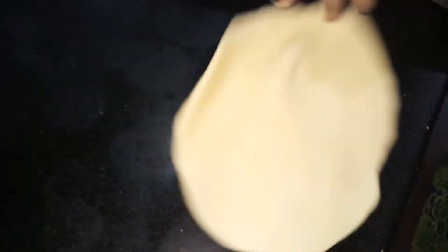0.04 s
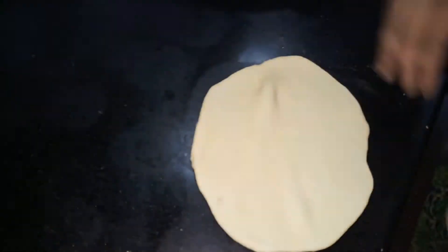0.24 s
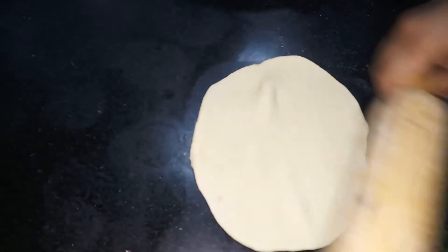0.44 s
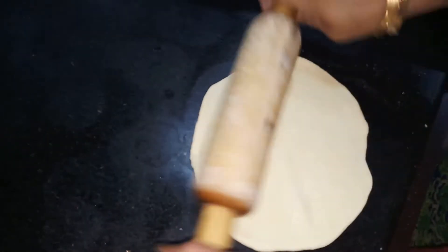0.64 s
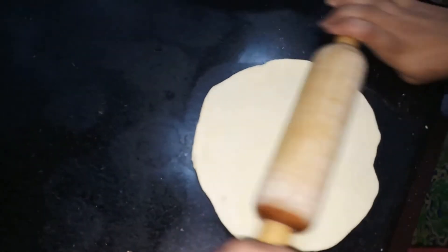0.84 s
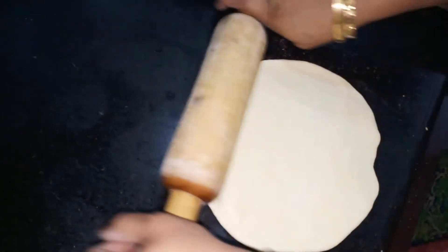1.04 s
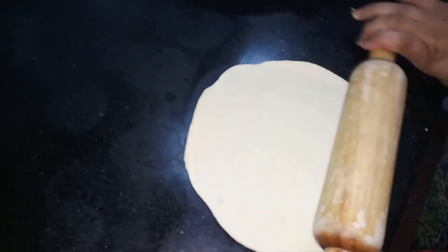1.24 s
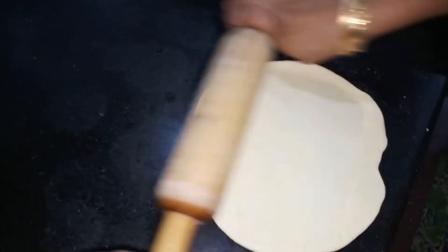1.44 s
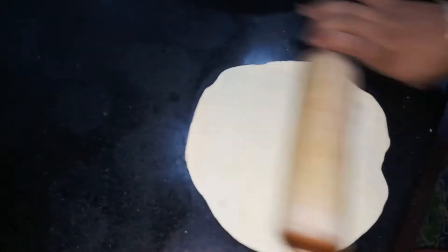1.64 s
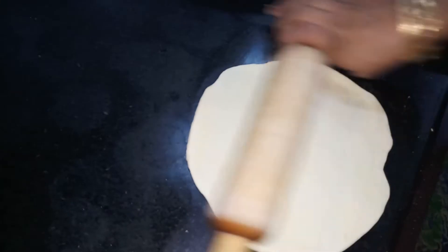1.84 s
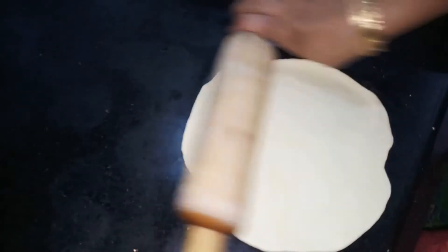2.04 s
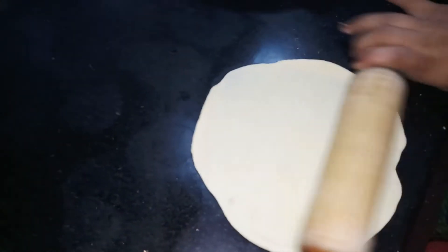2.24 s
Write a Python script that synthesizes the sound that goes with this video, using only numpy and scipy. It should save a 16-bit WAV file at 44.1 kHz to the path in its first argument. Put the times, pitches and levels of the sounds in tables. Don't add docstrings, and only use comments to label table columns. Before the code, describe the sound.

Dough slaps loudly onto a counter, a wooden pin lands with a resonant knock, then rhythmic hissing strokes roll back and forth with thin metal bangle clinks and faint creaks; hard reverberant room, phone pickup.

```python
import sys
import numpy as np
from scipy import signal
from scipy.fft import rfft, irfft, next_fast_len
from scipy.io import wavfile
from scipy.ndimage import map_coordinates

SR = 44100
rng = np.random.default_rng(int(sys.argv[2]) if len(sys.argv) > 2 else 0)


def pcm_store(signal):
    levels = np.round(np.clip(np.atleast_2d(signal), -1, 1) * 32767)
    wavfile.write(sys.argv[1], SR, levels.astype(np.int16).T)


def makeup_ratio(level_db):
    decades = np.asarray(level_db, float) / 20
    return 10 ** decades


N = 101429


def unit(x):
    return x / np.sqrt(np.mean(x ** 2) + 1e-20)


def along(points, hz):
    point_hz, value = np.transpose(points)
    return np.interp(np.log(hz + 1), np.log(point_hz + 1), value)


def wobble(rate_hz):
    knots = rng.standard_normal(int(N * rate_hz / SR) + 4)
    return map_coordinates(knots, [np.arange(N) * rate_hz / SR])


def filtered(x, response):
    size = next_fast_len(N + SR)
    spectrum = rfft(x, size) * response(np.fft.rfftfreq(size, 1 / SR))
    return irfft(spectrum, size)[..., :N]


def resonant(x, peaks):
    def response(f):
        total = 0
        for k, (hz, width, db) in enumerate(peaks):
            total = total + (-1) ** k * makeup_ratio(db) * 1j * f * width / (hz * hz - f * f + 1j * f * width)
        return total
    return filtered(x, response)


def bursts(rows):
    t = np.arange(N) / SR
    total = np.zeros(N)
    for start, db, t60 in rows:
        total += (t >= start) * makeup_ratio(db - 60 * abs(t - start) / t60) * rng.standard_normal(N)
    return total


def rings(modes):
    t = np.arange(SR) / SR
    return sum(makeup_ratio(db - 60 * t / t60) * np.sin(2 * np.pi * hz * t) for hz, db, t60 in modes)


# middle_s, half_length_s, rub_db, push_db (into the counter),
# weight_db (on the handles)
ROLLING_STROKES = [(0.062, 0.034, -76.5, -61, -76), (0.129, 0.017, -58, -55.5, -69),
                   (0.461, 0.026, -50, -60, -56.5), (0.555, 0.034, -52, -68.5, -56),
                   (0.676, 0.076, -55.5, -65, -64.5), (0.862, 0.037, -53, -64, -57.5),
                   (0.985, 0.038, -57.5, -76, -64), (1.08, 0.034, -50.5, -50, -59),
                   (1.302, 0.053, -49, -54, -56), (1.532, 0.051, -44.5, -59, -52),
                   (1.678, 0.14, -61, -66, -60), (1.767, 0.047, -48, -57.5, -53.5),
                   (1.887, 0.02, -57, -60.5, -61), (1.991, 0.051, -44, -62, -49.5),
                   (2.088, 0.062, -62.5, -81, -66.5), (2.257, 0.064, -45.5, -53, -52)]


def strokes():
    middle, half_length, *levels_db = np.transpose(ROLLING_STROKES)[:, :, None]
    bell = np.exp(-((np.arange(N) / SR - middle) / half_length) ** 2)
    return [np.sqrt((bell * makeup_ratio(2 * db)).sum(0)) for db in levels_db]


# pitch_hz, level_db (per Hz)
FLOUR_COLOUR = [(1650, -65.5), (2800, -43), (4210, -13), (4630, 5.5), (5640, 2.5), (8730, 8), (9820, 0),
                (15100, 2), (16000, -34)]
# pitch_hz, width_hz, level_db
PIN_BODY = [(1657, 170, -7.5), (2396, 115, 1.5), (3030, 870, -8), (4560, 400, 0.5)]


def rolling():
    def grit():
        return rng.standard_normal(N) * makeup_ratio(1.0 * wobble(470))

    rub, _, weight = strokes()
    hiss = unit(filtered(grit(), lambda hz: makeup_ratio(along(FLOUR_COLOUR, hz))))
    uneven_grit = grit() * makeup_ratio(1.7 * wobble(60))
    return rub * hiss + weight * unit(resonant(uneven_grit, PIN_BODY))


# start_s, level_db, t60_s
DOUGH_FLAPS = [
    (.1983, -21.5, 0.12),
    (.207, -17, 0.03),
    (.2112, -7.5, .012),
    (.2155, -14.5, 0.022),
    (.231, -24, 0.03),
]
# pitch_hz, width_hz, level_db
DOUGH_BODY = [(277, 200, -13), (610, 260, -10.5), (803, 99, 2.5), (987, 280, 2), (1560, 210, -13.5),
              (1967, 170, 6), (2140, 920, 0), (2820, 73, -16.5), (4780, 2900, -11), (8430, 1500, -15.5),
              (13520, 5300, -32.5)]
# start_s, pitch_hz, level_db, t60_s, rise_ms
AIR_POCKETS = [(.1983, 1260, -20.5, 0.012, 0.22), (.2093, 1126, -4.5, 0.015, 0.43),
               (0.2096, 2160, 0, 0.0057, 0.095), (.2105, 277, -21.5, 0.053, 3),
               (.2112, 4780, -13.5, 0.0072, 0.033), (.2112, 950, -8.5, 0.014, 0.076),
               (.2128, 842, -8, 0.037, .6), (0.2148, 2013, -5.5, 0.02, 0.43),
               (.2305, 846, -11.5, 0.019, .8), (.2345, 2155, -22, 0.035, 0.62),
               (.2425, 830, -28.5, .04, 1.5)]


def slap():
    start, hz, db, t60, rise_ms = np.transpose(AIR_POCKETS)[:, :, None]
    t = np.clip(np.arange(N) / SR - start, 0, None)
    rise = 1 - np.exp(-t * 1e3 / rise_ms)
    pockets = makeup_ratio(db - 60 * t / t60) * rise * np.sin(2 * np.pi * hz * t)
    return makeup_ratio(8.5) * resonant(bursts(DOUGH_FLAPS), DOUGH_BODY) - pockets.sum(0)


# start_s, level_db, t60_s
PIN_KNOCKS = [
    (.772, -32.5, 0.0237),
    (.7765, -18.5, 0.031),
]
# pitch_hz, width_hz, level_db
WOOD_BODY = [(676, 450, -8.5), (1140, 164, 5), (2200, 376, -9.5), (2920, 670, -10), (4700, 860, -6.5),
             (8500, 9700, -18)]


def pin_landing():
    return makeup_ratio(9.0) * resonant(bursts(PIN_KNOCKS), WOOD_BODY)


# start_s, level_db, softness_ms, deep_share_db (into the lowest pair)
COUNTER_BLOWS = [(0.214, -33, 0.9, -3), (0.233, -28, 5.7, 11), (0.771, -67, 0.27, -21),
                 (.779, -17, 0.44, -11.5), (0.79, -21.5, 2.1, -3), (0.799, -25.5, 1.04, 3),
                 (1.076, -48, 4.7, 6), (1.24, -51, 4, 11), (1.315, -49, 3.45, 9), (1.541, -49.5, 3.7, 7.5),
                 (1.743, -47, 3.9, 8.5), (1.799, -48.5, 4.1, 9.5), (2.21, -45.5, 4, 10),
                 (2.255, -45, 3.7, 10)]
# pitch_hz, level_db, t60_s
COUNTER_MODES = [(136.7, -19, .2), (154.1, -11.5, 0.38), (160, -8, 0.077), (190.5, -4.5, 0.08),
                 (219, -5.5, 0.065), (270, -10, 0.071), (288.4, -7, 0.12), (316, -9, 0.1),
                 (347, -12, 0.041), (384, -16, .08), (409.6, -13.5, 0.17), (480, -13.5, 0.06),
                 (510, -12.5, 0.17), (563, -21, .12)]


def counter():
    slab_hz = 84.2
    time = np.arange(N) / SR
    upper = rings(COUNTER_MODES)
    pair = rings([(92, -7.5, 0.49), (98, -4.5, 0.49)])

    def slab(hz):
        s = 1j * hz / slab_hz
        return (s ** 2 / (s ** 2 + 0.9 * s + 1)) ** 2

    start, db, soft_ms, deep_db = np.transpose(COUNTER_BLOWS)[:, :, None]
    blows = makeup_ratio(db) * np.exp(-((time - start) * 1e3 / soft_ms) ** 2) / (soft_ms * 78)
    deep_blows = (makeup_ratio(deep_db) * blows).sum(0)
    soft_noise = filtered(rng.standard_normal(N), lambda hz: 1 / (1 + (hz / 400) ** 2))
    damped_modes = (upper + makeup_ratio(-2.5) * pair) * makeup_ratio(-60 * time[:SR] / 0.5)
    hum = unit(signal.fftconvolve(soft_noise, damped_modes)[:N])
    low = signal.fftconvolve(blows.sum(0), upper)[:N]
    deep = signal.fftconvolve(deep_blows, pair)[:N] + strokes()[1] * hum
    return filtered(low, slab), filtered(deep, slab)


# start_s, level_db, t60_s
SHUDDER_BURSTS = [
    (.7795, -6, 0.062),
    (.785, -15.5, 0.4),
]
# pitch_hz, width_hz, level_db
SHUDDER_BODY = [(140, 40, -3), (185, 48, -0.5), (314, 104, 1.5), (486, 135, -4.5)]


def counter_shudder():
    low_rumble = resonant(bursts(SHUDDER_BURSTS), SHUDDER_BODY)
    return makeup_ratio(5.5) * resonant(low_rumble, [(296, 900, 0)])


# start_s, level_db, favoured_hz, brightness_db (per octave), ring_length (factor)
BANGLE_CONTACTS = [(.4203, -29.5, 4590, -6, .9), (0.4227, -29, 7620, -2.5, 0.806),
                   (0.43, -36, 6130, 1.5, 0.96), (.455, -37.5, 4590, 3, 0.88), (0.503, -32, 4780, -1, .6),
                   (.805, -27.5, 4590, -6.5, 0.6), (1.0597, -26.5, 6130, -2.5, 1),
                   (1.0625, -26, 6890, 7.5, .8), (1.067, -30.5, 4590, 0.5, 0.67),
                   (1.0715, -26.5, 4590, 4, .8), (1.0775, -32, 11530, 9, 0.92),
                   (1.0817, -15.5, 15400, 6.5, 0.52), (1.0814, -17, 8290, 3, 0.9),
                   (1.0845, -19.5, 8290, 2.5, .7), (1.0878, -20.5, 7920, 7.5, 0.62),
                   (1.0925, -21, 7920, 5.5, .6), (1.0955, -22.5, 7920, 5, 1.2),
                   (1.1055, -26.5, 8290, 2, .8), (1.109, -31.5, 8290, 1.5, 0.74),
                   (1.491, -24.5, 6130, -1, 0.63), (1.4955, -36.5, 11530, 3.5, 0.38),
                   (1.5148, -35.5, 6130, 0.5, 1.2), (1.5207, -22.5, 6890, 3.5, 0.71),
                   (1.528, -24, 4590, 2.5, 0.78), (1.5335, -23.5, 4780, 7, 0.65),
                   (1.541, -23, 5400, 6, 0.95), (1.5476, -23, 8290, -1, 0.62),
                   (1.5545, -30.5, 11530, 0, .7), (1.83, -39, 6130, 5.5, 0.65),
                   (1.931, -25, 6130, -6.5, 0.91), (1.959, -34.5, 4780, 11, .8),
                   (1.976, -56, 6130, -5, 0.68), (1.9868, -24.5, 6130, -6.5, 0.83),
                   (1.9961, -21, 8290, 2.5, 0.49), (2.0005, -27.5, 9200, 10, 0.69),
                   (2.0791, -35.5, 8290, -2, 0.78)]
# pitch_hz, level_db, t60_s
BANGLE_MODES = [(4590, -4, 0.11), (4780, -5, 0.043), (5400, -1, 0.018), (6130, 2, 0.044),
                (6890, -1.5, 0.049), (7620, -6.5, 0.097), (7920, 5.5, 0.017), (8290, -0.5, 0.049),
                (9200, -7.5, 0.069), (10740, -6, 0.039), (11530, -5, 0.047), (12340, -8.5, 0.032),
                (14450, -14, 0.041), (15400, -15.5, .03)]


def bangles():
    favour_db, favour_octaves, spread_db = 9, 0.04, -4
    detune, chatter_depth, chatter_hz, free_s = 0.006, 0.7, 280, 0.0026
    tick_db, tick_s, clink_db, floor_hz = -3, 0.045, -13.5, 3850
    out, t = np.zeros(N + SR), np.arange(SR // 4) / SR
    hz, mode_db, t60 = np.transpose(BANGLE_MODES)[:, :, None]
    for start, db, favoured_hz, bright_db, length in BANGLE_CONTACTS:
        luck = rng.standard_normal((2, len(hz), 1))
        octaves_off = np.log2(hz / favoured_hz)
        gain_db = mode_db + favour_db * np.exp(-(octaves_off / favour_octaves) ** 2)
        gain_db = gain_db + bright_db * np.log2(hz / 6000) + spread_db * np.tanh(luck[0])
        knots = rng.standard_normal((len(hz), chatter_hz // 4 + 2))
        jitter = np.array([np.interp(t * chatter_hz, np.arange(len(k)), k) for k in knots])
        chatter = 1 + chatter_depth * (1 - np.exp(-t / free_s)) * jitter
        ring_hz = hz * (1 + detune * luck[1] * (hz / 7000) ** 2)
        ring = makeup_ratio(gain_db - 60 * t / (t60 * length)) * chatter * np.sin(2 * np.pi * ring_hz * t)
        sharp_noise = np.diff(rng.standard_normal(len(t) + 2), 2) / 2
        tick = makeup_ratio(tick_db + bright_db - 60 * t / tick_s) * sharp_noise
        clink = (ring.sum(0) + tick) * (1 - np.exp(-t / 0.0001))
        out[round(start * SR):][:len(t)] += makeup_ratio(db + clink_db) * clink
    return filtered(out[:N], lambda f: 1 / (1 + floor_hz / (1j * f + 1)) ** 2)


# start_s, pitch_hz, level_db, rise_s, t60_s
HANDLE_CREAKS = [
    (1.082, 1582, -39.5, 0.012, 0.078),
    (1.085, 2930, -44.5, 0.0067, 0.13),
    (1.765, 1600, -42.5, 0.005, 0.05),
    (2.095, 1746, -55.5, 0.0098, 0.37),
    (2.206, 1580, -40, 0.0014, 0.034),
    (2.215, 1604, -51, 0.005, 0.38),
]


def creaks():
    t = np.arange(N) / SR
    total = np.zeros(N)
    for start, hz, db, rise_s, t60 in HANDLE_CREAKS:
        level = makeup_ratio(db - 60 * abs(t - start) / t60 + 3.8 * wobble(90))
        rise = 1 - np.exp(-np.clip(t - start, 0, None) / rise_s)
        phase = 2 * np.pi * np.cumsum(hz + 45 * wobble(130)) / SR
        total += level * rise * np.sin(phase)
    return total


# pitch_hz, t60_s
ROOM_DECAY = [(100, 0.55), (800, 0.48), (2200, 0.44), (5000, 0.38), (12000, 0.31)]


def kitchen(x):
    hz, t, noise = signal.stft(rng.standard_normal(SR), SR, nperseg=256)
    decay = makeup_ratio(-60 * t / along(ROOM_DECAY, hz)[:, None])
    tail = signal.istft(noise * decay, SR, nperseg=256)[1]
    late = np.pad(x, (200, 0))
    return signal.fftconvolve(late, tail / np.linalg.norm(tail))[:N]


# pitch_hz, level_db (per Hz)
AIR_COLOUR = [(30, -6.5), (480, 1.5), (850, -17), (1290, -13), (1700, -18.5), (3800, -24), (8600, -13.5),
              (9500, -37.5)]
# time_s, level_db
AIR_SWELL = [(0, -2), (0.699, -5.5), (1.22, -4.5), (1.499, -1), (2.001, 2), (2.3, 2)]


def hush():
    swell_db = np.interp(np.arange(N) / SR, *np.transpose(AIR_SWELL))
    air = unit(filtered(rng.standard_normal(N), lambda hz: makeup_ratio(along(AIR_COLOUR, hz))))
    return makeup_ratio(-55 + swell_db) * air


def scene():
    dough, wood = slap(), pin_landing()
    low, deep = counter()
    metal = bangles() + creaks()
    wet = makeup_ratio(-9.5) * kitchen(dough) + makeup_ratio(-7) * kitchen(wood)
    wet = wet + makeup_ratio(-7.5) * kitchen(low) + makeup_ratio(-15) * kitchen(metal)
    return (rolling() + dough + wood + low + deep + counter_shudder() + metal + wet + hush())[None]


def top_cut(x):
    return signal.sosfilt(signal.butter(12, 16980, fs=SR, output="sos"), x)


def record(dry):
    def bass_cut(hz):
        s = 1j * hz / 60
        return s ** 2 / (s ** 2 + 1.2 * s + 1)

    x = filtered(dry, bass_cut)
    x = x / (1 + abs(x / 1.1) ** 6) ** (1 / 6)
    mix = filtered(x, lambda hz: np.where(hz < 15900, 1, makeup_ratio(-37.5)))
    return top_cut(mix)


dry = scene()
out = record(dry)
pcm_store(out)
```